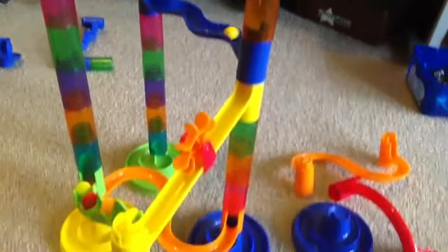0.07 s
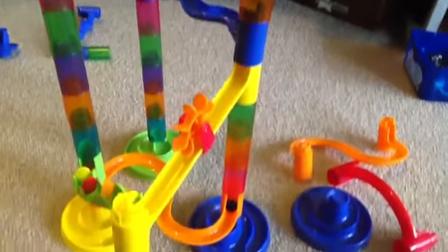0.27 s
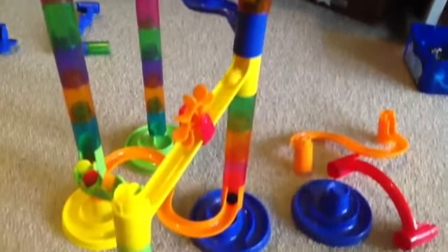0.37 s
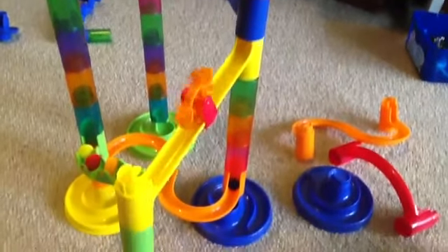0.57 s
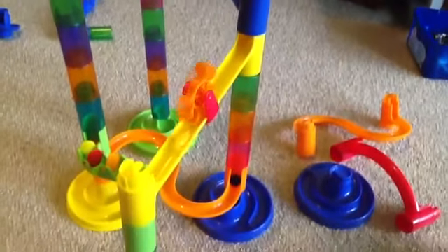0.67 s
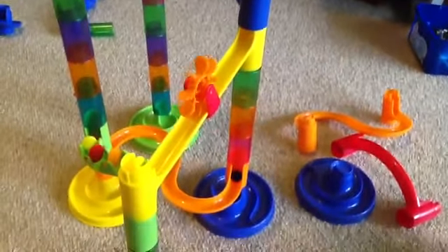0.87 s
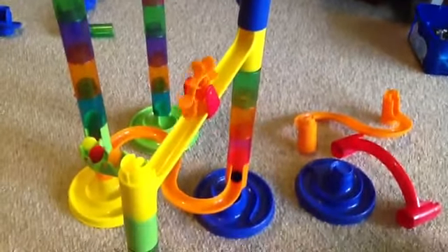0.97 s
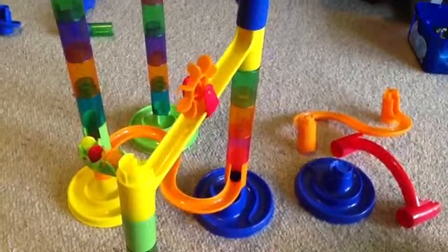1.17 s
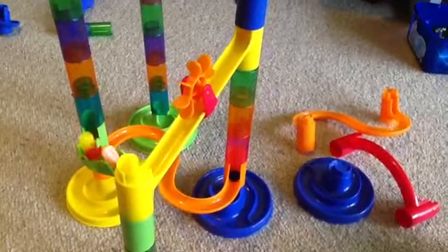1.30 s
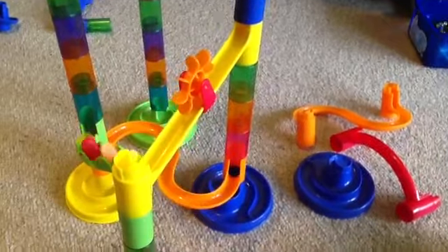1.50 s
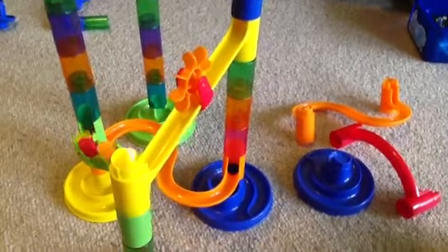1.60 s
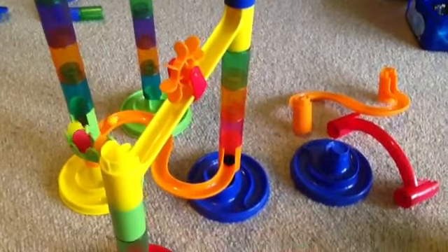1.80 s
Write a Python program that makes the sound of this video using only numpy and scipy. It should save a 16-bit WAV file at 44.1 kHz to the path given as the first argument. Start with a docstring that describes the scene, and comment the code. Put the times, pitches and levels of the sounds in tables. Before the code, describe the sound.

A marble tumbles down a plastic marble run, making sharp, bright clacks in bouncing bursts. It rolls with a faint rattle between the hits, and the clacks stop shortly before the end. The room is quiet.

```python
"""Marble on a plastic run

A marble tumbles down a plastic marble run in a quiet carpeted room. It clacks against the chutes
in bouncing bursts and rolls with a faint rattle in between. Each clack is a few milliseconds
of shaking plastic; the hollow tubes and the room ring on after it."""
import sys
import numpy as np
from scipy import signal
from scipy.fft import rfft, irfft, next_fast_len
from scipy.io import wavfile
from scipy.ndimage import uniform_filter1d

SR = 44100
rng = np.random.default_rng(int(sys.argv[2]) if len(sys.argv) > 2 else 0)


def store_wav(level_fs):
    """Save 16-bit WAV to argv[1]."""
    pcm = np.round(np.clip(np.atleast_2d(level_fs), -1, 1) * 32767)
    wavfile.write(sys.argv[1], SR, pcm.T.astype(np.int16))


N = 81585
TIME = np.arange(N) / SR
BANDS = 31.25 * 2 ** np.arange(0, 9.1, .25)   # centres in Hz, four to an octave


def from_db(db):
    """Turn decibels into a number to multiply by."""
    return 10 ** (np.asarray(db) / 20)


def at_hz(points, hz):
    """Look up a frequency in a table, blending between rows on an octave scale."""
    frequencies, values = np.transpose(points)
    return np.interp(np.log(hz), np.log(frequencies), values)


def unit(x):
    """Scale a sound so that its energy is one."""
    return x / np.sqrt(np.sum(x ** 2) + 1e-20)


def band(x, hz):
    """Keep only the quarter octave around a frequency."""
    edges = hz * 2 ** np.array([-.125, .125])
    return signal.sosfilt(signal.butter(2, edges, "band", fs=SR, output="sos"), x + 1e-18)


def causal(gain):
    """Turn evenly spaced gains into a filter that rings after a hit, never before (minimum phase)."""
    cepstrum = irfft(np.log(gain + 1e-9))
    half = len(cepstrum) // 2
    cepstrum[1:half] *= 2
    cepstrum[half + 1:] = 0
    return np.exp(rfft(cepstrum))


def room_tone():
    """The air makes a steady low murmur and a faint hiss."""
    # The background noise. Each row: frequency in Hz, level per band in dB.
    floor = [(50, -82.5), (130, -74.5), (600, -78), (3000, -78), (14000, -77.5)]
    white = rng.standard_normal((2, N))
    bands = (from_db(at_hz(floor, hz)) * unit(band(white[k % 2], hz)) for k, hz in enumerate(BANDS))
    return np.sqrt(N) * sum(bands)


def room_echo(x):
    """The room throws sound back: strong early echoes, then a short tail whose highs die first."""
    # The echo's tone. Each row: frequency in Hz, relative level in dB.
    colour = [(200, -12.5), (2500, -6.5), (3400, -9), (4800, -0.5), (6000, -11), (9000, -4.5), (14000, -3)]
    # The echo's length. Each row: frequency in Hz, seconds to fade by 60 dB.
    fade_times = [(300, 0.57), (4000, 0.3), (15000, 0.26)]
    delay_s, early_s = 0.0028, 0.0067
    age = np.maximum(TIME[:SR // 2] - delay_s, 0)
    early_boost = 1 + np.exp(-age / early_s)
    white = rng.standard_normal((2, len(age)))
    tail = 0
    for k, hz in enumerate(BANDS):
        envelope = (age > 0) * from_db(-60 * age / at_hz(fade_times, hz)) * early_boost
        gain = from_db(at_hz(colour, hz)) * np.sqrt(.35 * hz / SR)   # wider bands hold more energy
        tail = tail + gain * unit(band(white[k % 2] * envelope, hz))
    return signal.fftconvolve(x, tail)[:N]


def thump():
    """One soft, low note at the very start dies away quickly."""
    start_s, level_db, pitch_hz, fade_s = 0.0022, -32, 213, 0.033
    t = np.maximum(TIME - start_s, 0)
    return from_db(level_db - 60 * t / fade_s) * np.sin(2 * np.pi * pitch_hz * t)


def tube_ring(x, notes, detune=0):
    """Hollow plastic rings at its own notes; detune shifts each a little at random."""
    out = 0
    for hz, db, fade_s in notes:
        decay = from_db(-60 / (fade_s * SR))
        angle = 2 * np.pi * hz * (1 + detune * (rng.random() - .5)) / SR
        feedback = [1, -2 * decay * np.cos(angle), decay * decay]
        out = out + from_db(db) * signal.lfilter([1 - decay, 0, decay - 1], feedback, x + 1e-18)
    return out


def column_ring(hits):
    """For a moment the marble clatters in a column that rings longer than the tubes."""
    # The column's notes. Each row: pitch in Hz, gain in dB, seconds to fade by 60 dB.
    notes = [(1500, 10, 0.061), (2445, -4, 0.13)]
    in_column = (TIME > 0.63) & (TIME < 1)
    return tube_ring(hits * in_column, notes)


def rolling():
    """Tiny bumps under the rolling marble rattle the chute."""
    # The rattle's loudness. Each row: time in seconds, level in dB.
    loudness = [(0, -53), (.11, -50.5), (.2, -65), (.33, -48.5), (.55, -60), (.64, -46.5), (.72, -70.5),
                (.99, -58), (1.12, -51.5), (1.27, -55), (1.56, -56.5), (1.62, -73), (1.65, -56),
                (1.68, -78.5), (1.79, -56), (1.85, -63)]
    # The rattle's tone. Each row: frequency in Hz, relative level per band in dB.
    colour = [(180, -21), (1050, -7), (1550, -8), (1900, -9.5), (2500, 6), (3200, -2), (3900, -11),
              (4900, -14.5), (6500, -20), (14000, -44)]
    bumps_per_s, spread_db = 470, 3.5
    heights = from_db(spread_db * np.minimum(rng.exponential(1, N), 3)) * rng.choice([-1, 1], N)
    bumps = heights * (rng.random(N) < bumps_per_s / SR)
    size = next_fast_len(N) * 2
    hz = np.fft.rfftfreq(size, 1 / SR) + 1
    gain = from_db(at_hz(colour, hz)) / np.sqrt(hz) / (1 + (150 / hz) ** 2)
    rattle = irfft(rfft(bumps, size) * causal(gain))[:N]
    return np.sqrt(N) * unit(rattle) * from_db(np.interp(TIME, *np.transpose(loudness)))


def knocks():
    """A heavy landing rings the two lowest notes of the piece it hits."""
    # Each row: start in seconds, lower note's level in dB, lower note in Hz, upper note in Hz.
    landings = [(0.2474, -26.5, 1107, 1390), (.399, -31.5, 606, 965), (0.7776, -31, 620, 1415),
                (1.2925, -40, 343, 470), (1.345, -36, 323, 540)]
    db_per_octave, fade_s = 7, 0.024
    out = 0
    for start_s, db, low_hz, high_hz in landings:
        t = np.maximum(TIME - start_s, 0)
        for hz, sign in ((low_hz, 1), (high_hz, -1)):
            level = from_db(db + db_per_octave * np.log2(hz / low_hz) - 60 * t / fade_s)
            attack = 1 - np.exp(-t * hz)
            out = out + sign * level * attack * np.sin(2 * np.pi * hz * t)
    return out


def clack(ring_db, pitch_hz, body_db, edge_db, snap_db, size=2048):
    """One hit: a dull thud, a chatter of waves in the wall and a snap, coloured by where it lands."""
    # The plastic's own tone. Each row: frequency in Hz, relative level in dB.
    plastic = [(180, -16), (330, -14), (620, -6), (1350, -7.5), (1600, -19.5), (2600, -7.5), (3300, -7),
               (3900, -10), (4800, 1.5), (5600, -1.5), (7200, 1.5), (8800, 5.5), (11000, -4), (14500, -8.5)]
    chatter_s, release_s, after_s, thud_s, snap_s = 0.0025, 0.0006, 0.005, 0.0091, 0.001
    ring_octaves, spread_db = 0.12, 2
    t, hz = np.arange(size) / SR, np.fft.rfftfreq(size, 1 / SR) + 1
    noise = rng.standard_normal((3, size))
    burst = np.exp(-np.maximum(t - chatter_s, 0) / release_s)
    chatter = noise[0] * (burst + from_db(-17) * np.exp(-t / after_s))
    chatter[0] += 3.3   # the crack of first contact
    thud = noise[1] * np.exp(-t / thud_s)
    snap = noise[2] * np.exp(-t / snap_s)
    low, high = 1 / (1 + (hz / 1200) ** 4), 1 / (1 + (7500 / hz) ** 8)
    parts = (low, thud), ((1 - low) * (1 - high), chatter), (high, snap)
    spectrum = sum(causal(share) * rfft(unit(part)) for share, part in parts)
    # Dividing by this outline evens out the noise before it gets its tone.
    outline = np.sqrt(uniform_filter1d(abs(spectrum) ** 2, size=21) + 1e-9)
    balance = [(1150, body_db), (1800, 0), (3700, 0), (4400, edge_db), (6000, edge_db), (8300, snap_db)]
    db = at_hz(plastic, hz) + at_hz(balance, hz)
    db += ring_db * np.exp(-.5 * (np.log2(hz / pitch_hz) / ring_octaves) ** 2)
    db += spread_db * np.interp(hz, BANDS, rng.standard_normal(len(BANDS)))   # no two hits alike
    radiated = np.sqrt(SR / hz) / (1 + (190 / hz) ** 4)
    return irfft(spectrum * causal(from_db(db) * radiated / outline))


def marble_hits(pieces=5):
    """The marble's clacks and nudges, dealt in turn to the pieces of the track."""
    # Hard, bright hits. Each row: start in seconds, relative level in dB, pitch in Hz,
    # then the boost or cut in dB of the body (lows), edge (highs) and snap (very top).
    clacks = [(0.2118, -14, 2700, -18.5, -6, -36), (0.2462, -3, 3020, -28.5, -0.5, -24),
              (0.2633, -4.5, 2620, -28, -10, -19.5), (0.2778, -7.5, 3530, -27.5, -6, -26),
              (0.3548, -13, 3370, -27.5, -7, -31), (0.398, -7, 2230, -26, -3.5, -28),
              (0.4015, -6.5, 3050, -22.5, -15.5, -25), (0.4948, -31.5, 3640, -6, 4.5, -9.5),
              (0.6848, -14, 2150, -23.5, -12, -42), (0.7408, -4.5, 2450, -25.5, -1.5, -19),
              (0.7568, -15.5, 2800, -28.5, -3, -21), (0.7775, -7, 2430, -29, -8, -25),
              (0.7946, -11, 2450, -36.5, -3, -26), (0.824, -12, 2420, -25, -10, -32),
              (0.9058, -20.5, 3240, -23, -7, -21.5), (1.0061, -15.5, 2840, -26, -8, -17),
              (1.0842, -18.5, 2900, -29, -5.5, -19.5), (1.141, -12.5, 2550, -27.5, -6.5, -18),
              (1.2073, -15.5, 3540, -36, -4, -16.5), (1.292, -3.5, 3360, -36.5, -6.5, -26.5),
              (1.313, -8.5, 3330, -26, -8.5, -29), (1.3445, -7, 2920, -22.5, -2, -25),
              (1.3652, -11, 2700, -28, -15, -26), (1.3728, -10, 2590, -46, -13.5, -24.5),
              (1.4187, -12, 2620, -18.5, -1.5, -26), (1.474, -13, 3000, -22, -7, -32),
              (1.4948, -18, 2900, -42.5, -9, -36), (1.5145, -14, 3200, -22.5, -3, -33)]
    # Soft, dull nudges against the chute wall. Each row: start in seconds, relative level in dB.
    nudges = [(0.0792, -29.5), (0.0897, -20.5), (0.2915, -14.5), (0.4589, -17), (0.5877, -30),
              (0.594, -19.5), (0.6037, -21), (0.8288, -25), (0.8507, -20), (0.8664, -21.5), (0.968, -28),
              (0.9795, -26), (1.0203, -17.5), (1.0963, -17.5), (1.1253, -17), (1.1493, -14), (1.1743, -20),
              (1.2278, -19.5), (1.2854, -20), (1.3847, -18), (1.5424, -18), (1.5651, -22), (1.579, -20.5)]
    nudge_hz, body_db, edge_db, snap_db = 2697, -28, -18, -41.5
    soft = [(start_s, db, nudge_hz * 2 ** rng.normal(0, 0.12), body_db, edge_db, snap_db)
            for start_s, db in nudges]
    out = np.zeros((pieces, N + SR))
    for k, (start_s, db, *colour) in enumerate(list(clacks) + soft):
        ring_db = max(11.5 + 0.24 * db, 0)   # light taps click dryly, hard ones ring
        hit = 20 * from_db(db - 12.5) * clack(ring_db, *colour)
        start = int(start_s * SR)
        out[k % pieces, start:start + len(hit)] += hit
    return out[:, :N]


def scene():
    """Each piece of track rings on and reaches the microphone by its own paths through the room."""
    # The hollow tubes' notes. Each row: pitch in Hz, gain in dB, seconds to fade by 60 dB.
    tube_notes = [(1553, 6.5, 0.021), (2043, -5.5, 0.044), (2450, -4.5, 0.026)]
    hits = marble_hits()
    hollow = knocks() + column_ring(hits.sum(axis=0))
    out = thump() + room_tone() + hollow + room_echo(hollow)
    for contact in [*hits, rolling()]:
        piece = contact + tube_ring(contact, tube_notes, detune=0.029)
        out = out + piece + room_echo(piece)
    return out[None]


def record(dry):
    """The small microphone loses the bass, and the very highest treble is cut."""
    low_cut_hz, high_cut_hz = 126, 15200
    thin = signal.sosfilt(signal.butter(2, low_cut_hz, "high", fs=SR, output="sos"), dry)
    return signal.sosfilt(signal.cheby1(12, .2, high_cut_hz, fs=SR, output="sos"), thin)


dry = scene()
out = record(dry)
store_wav(out)
```